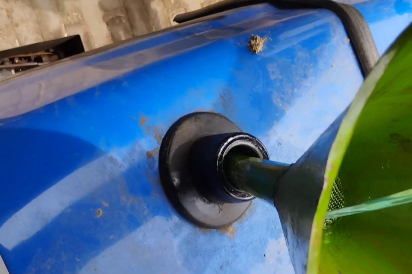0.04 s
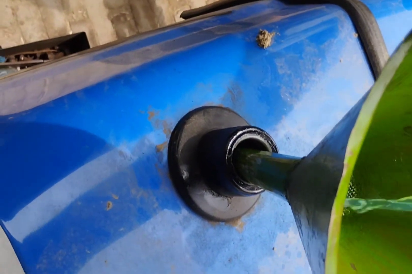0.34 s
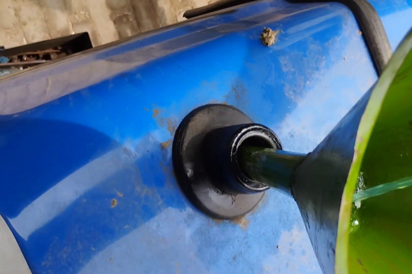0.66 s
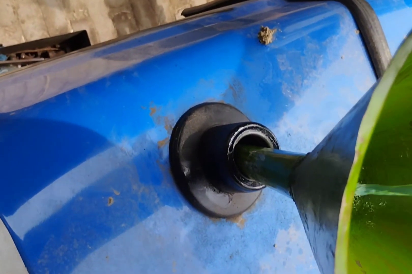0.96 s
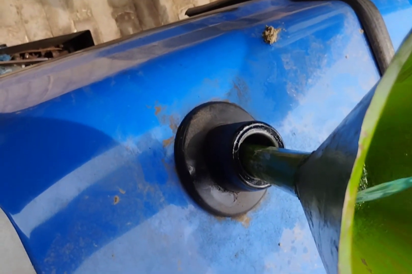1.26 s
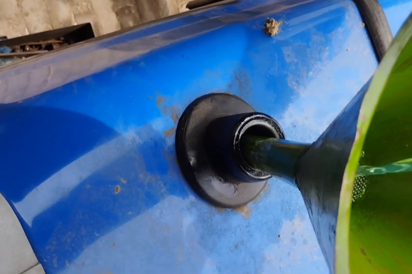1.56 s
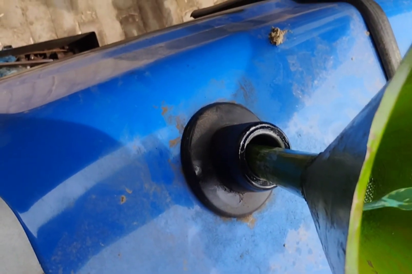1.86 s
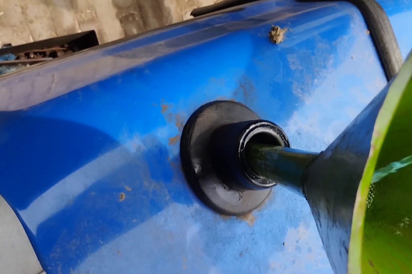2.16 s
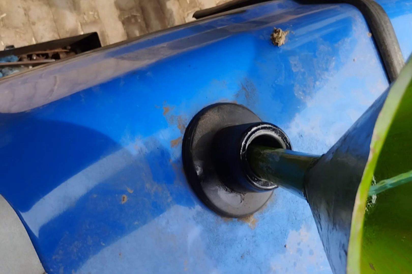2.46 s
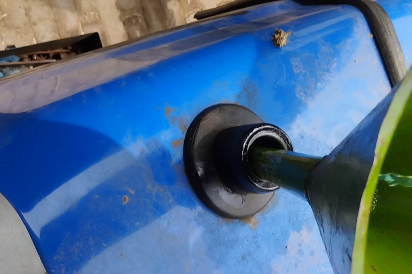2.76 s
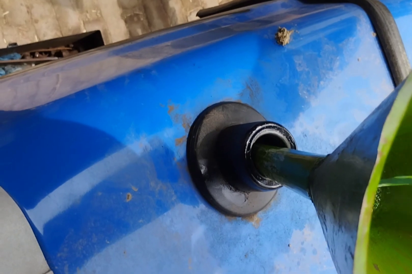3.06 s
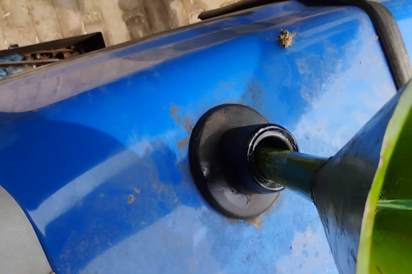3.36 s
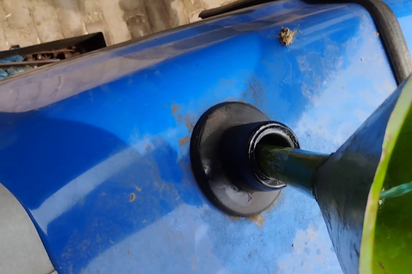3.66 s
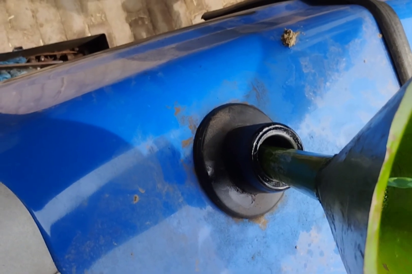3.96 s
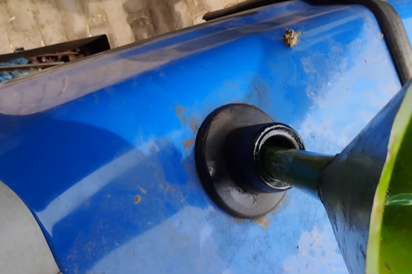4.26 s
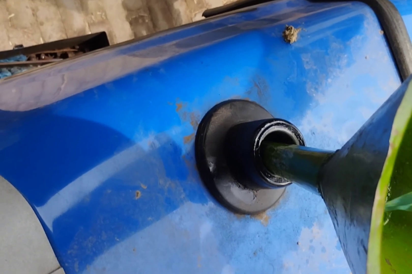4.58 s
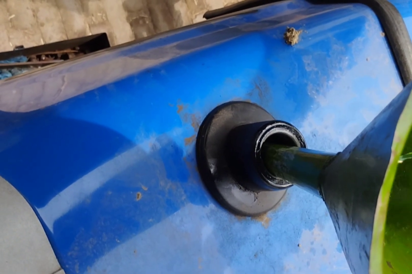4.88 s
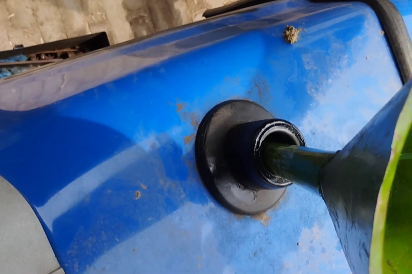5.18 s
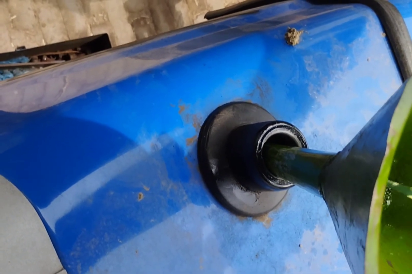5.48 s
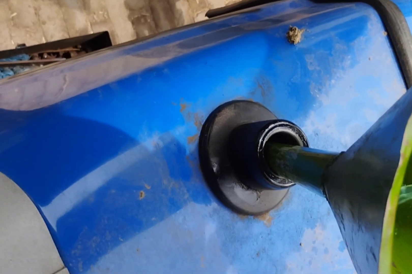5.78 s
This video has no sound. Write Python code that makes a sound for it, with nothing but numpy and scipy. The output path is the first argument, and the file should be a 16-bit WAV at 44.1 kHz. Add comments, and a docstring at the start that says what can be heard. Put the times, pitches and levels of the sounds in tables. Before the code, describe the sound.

Fuel trickles in spurts into a plastic funnel, fizzing on the strainer and gurgling hollowly down the spout, with light wind.

```python
"""Outdoors at a metal tank, the microphone close to a plastic funnel. A thin stream of fuel trickles
onto the strainer in spurts. Spray and bursting froth crackle on the mesh, drops tick and splat on the
funnel wall, and the spout gurgles hollowly, its note sinking at first as the neck clears.
Light wind rumbles on the microphone."""
import sys
import numpy as np
from scipy import signal
from scipy.fft import rfft, irfft, next_fast_len
from scipy.io import wavfile
from scipy.ndimage import map_coordinates

SR = 44100
rng = np.random.default_rng(int(sys.argv[2]) if len(sys.argv) > 2 else 0)


def transcribe(signal):
    """Save signal, clipped to [-1, 1], as a 16-bit WAV file at the path in sys.argv[1]."""
    frames = np.atleast_2d(signal).T
    limited = np.clip(frames, -1, 1)
    pcm = np.round(limited * 32767).astype(np.int16)
    wavfile.write(sys.argv[1], SR, pcm)


N = 257103
TIME = np.arange(N) / SR
EVENT_TIME = TIME[:SR // 10]  # the 0.1 s that one drop or bubble is given
TRICKLE_DB = -57.5  # relative level of the spray between spurts

# Resonances of the plastic funnel. Each row: frequency in Hz, width in Hz, gain in dB.
FUNNEL_MODES = [(658, 100, 5), (800, 60, 3.5), (875, 74, 12), (992, 42, 7.5), (1284, 49, 5),
                (1482, 38, 4.5), (1537, 31, 6.5), (1714, 44, 6), (1822, 69, 6.5), (1916, 56, 0),
                (2125, 30, 4.5), (2633, 180, -2.5), (3076, 186, 5), (3315, 114, 5), (3660, 170, -17),
                (4620, 90, 0.5), (4800, 180, -35)]
# Tone colour of the spray. Each row: frequency in Hz, gain in dB.
SPRAY_COLOUR = [(300, -17), (1500, -19), (4200, -17.5), (5500, -15), (7000, -8.5), (8000, -2), (8900, -2),
                (9900, -5.5), (10700, -3), (12000, -9.5), (13500, -11), (16000, -11.5)]
# Gulps in the spout. Each row: start in seconds, relative levels of plop and slap in dB, pitch in Hz.
SPOUT_GULPS = [(.056, -48, -58, 940), (.076, -46, -57, 846), (.16, -47, -72, 730), (.253, -37.5, -58, 766),
               (.43, -44, -72, 667), (.555, -43.5, -55.5, 850), (.703, -36, -55.5, 446),
               (.8215, -42, -62, 426), (.8365, -56, -53, 503), (1.22, -37, -68, 445),
               (1.819, -46, -58.5, 485), (2.056, -43, -75, 450), (2.215, -43, -76, 427),
               (2.412, -49, -58, 487), (2.61, -41, -58, 500), (2.732, -44, -63, 455),
               (3.254, -40, -57, 475), (3.506, -44, -67, 510), (3.636, -53, -58, 480),
               (3.85, -42, -56, 455), (3.954, -45, -57, 472), (4.066, -47, -61, 460),
               (4.072, -42.5, -68, 660), (4.24, -41.5, -66, 496), (4.366, -38.5, -58, 465),
               (4.561, -45, -55.5, 492), (4.777, -39, -62, 474), (4.996, -44, -78, 530),
               (5.123, -43.5, -68, 450), (5.308, -42.5, -68, 460), (5.425, -45.5, -72, 480),
               (5.543, -47, -53, 480), (5.543, -49, -62.5, 763)]


def spurts():
    """The wavering stream swells and ebbs over a steady trickle: level curves for spray and splatter."""
    # Each row: middle in seconds, relative spray level in dB, length in seconds,
    # relative splatter level in dB.
    landings = [(0.094, -58, 0.08, -63), (0.145, -56, 0.043, -64.5), (0.274, -51.5, 0.033, -62),
                (0.471, -49, 0.059, -66), (0.691, -52, 0.048, -59.5), (0.874, -58, 0.058, -68),
                (0.947, -52, 0.02, -74.5), (1.084, -52, 0.062, -67), (1.298, -50.5, 0.043, -80),
                (1.482, -54.5, 0.059, -64.5), (1.718, -51, 0.1, -77), (1.94, -45, 0.029, -64),
                (2.182, -51.5, 0.04, -67), (2.436, -56, 0.17, -73), (2.71, -51, 0.082, -66.5),
                (2.948, -50.5, 0.048, -63.5), (3.123, -54, 0.031, -64.5), (3.266, -55, 0.074, -67),
                (3.495, -46.5, 0.039, -63.5), (3.683, -49.5, 0.046, -74), (3.941, -48.5, 0.053, -67),
                (4.166, -53, 0.13, -66.5), (4.381, -51, 0.059, -64.5), (4.493, -53.5, 0.04, -64),
                (4.646, -51, 0.038, -67), (4.845, -51.5, 0.17, -65), (5.054, -54, 0.036, -71),
                (5.177, -49, 0.065, -65), (5.33, -51.5, 0.025, -69), (5.44, -48.5, 0.091, -64.5),
                (5.602, -50, 0.018, -66), (5.71, -51, 0.055, -65), (5.783, -53.5, 0.054, -67)]
    middle, spray_db, length, splatter_db = np.transpose(landings)
    bells = .5 ** ((2 * (TIME[:, None] - middle) / length) ** 2)
    def level(db, steady_db):
        return 10 * np.log10(amp(steady_db) ** 2 + bells @ amp(db) ** 2)
    return level(spray_db, TRICKLE_DB), level(splatter_db, steady_db=-92)


def spray(level_db, surge):
    """Froth crackles over the fine hiss of the mesh, which sings more evenly in one narrow band."""
    # Tone colour of the mesh's hiss. Each row: frequency in Hz, gain in dB.
    mesh_colour = [(300, -17.5), (1500, -24.5), (4200, -22.5), (5600, -11.5), (7000, -6.5), (8000, -4.5),
                   (8900, -7), (10700, -6.5), (12000, -7.5), (16000, -12)]
    bubbles = froth(count=3300, pitch_hz=10020, drift=0.13, scatter=0.162, cycles=10, spread_db=4)
    crackle = unit(coloured(bubbles, SPRAY_COLOUR))
    hiss = unit(coloured(impacts(rate=6000, spread_db=3.5) * amp(3.5 * wobble(170)), mesh_colour))
    sing = unit(resonate(impacts(rate=5000, spread_db=6.5), [(9030, 460, 0)]))
    fizz = amp(level_db + 2.7 * surge - 5) * (crackle + hiss)
    return fizz + amp(-60.5 + 0.25 * (level_db - TRICKLE_DB)) * sing


def pops(grit_db=3.5, harden=0.099, shorten=0.03):
    """Clumps of bubbles burst on the mesh: small ones round and pitched, big ones a short, broad snap."""
    # Each row: time in seconds, relative level in dB, pitch in Hz.
    clumps = [(0.0645, -29.5, 9000), (0.079, -27, 7750), (.194, -27, 9900), (.212, -42, 9100),
              (0.257, -35, 9200), (0.2804, -29, 9600), (0.3193, -24.5, 9800), (0.3752, -32, 9200),
              (0.432, -18, 10100), (0.5004, -40, 9400), (0.561, -33.5, 8600), (0.697, -25.5, 9700),
              (0.837, -26, 8900), (0.984, -34, 8800), (1.032, -31, 10600), (1.066, -32, 8600),
              (1.145, -21, 9160), (1.306, -25.5, 9300), (1.492, -25, 7500), (1.825, -24.5, 9200),
              (1.8875, -22.5, 10900), (1.9173, -26, 12000), (1.938, -25.5, 9500), (1.952, -30, 8700),
              (1.998, -26.5, 8900), (2.158, -31, 8050), (2.164, -29, 8700), (2.176, -30, 8140),
              (2.21, -23, 8600), (2.27, -27.5, 9860), (2.449, -29, 9100), (2.4616, -32.5, 8500),
              (2.69, -22.5, 8150), (2.704, -32, 7990), (2.7432, -28, 9100), (2.796, -27, 8750),
              (2.829, -28, 8130), (3.196, -29, 10650), (3.228, -34, 10500), (3.257, -37, 8700),
              (3.302, -31, 9850), (3.3855, -30.5, 10700), (3.434, -26, 9700), (3.535, -24, 9200),
              (3.6, -30, 9800), (3.749, -25, 8800), (3.845, -28.5, 9500), (4.2974, -27.5, 8800),
              (4.3758, -28, 7600), (4.5579, -13, 9100), (4.634, -25, 8700), (4.817, -29, 7600),
              (4.8896, -24, 9600), (5.0566, -26.5, 10000), (5.125, -29.5, 8500), (5.167, -28, 10700),
              (5.5874, -35, 9200), (5.6926, -36, 8200), (5.781, -29.5, 9400)]
    out, t = np.zeros(N), EVENT_TIME
    for s, db, hz in clumps + strays(count=14, level_db=-30, spread_db=2.5, pitch_hz=9470, scatter=0.12):
        length_s = 0.0062 * np.exp(-shorten * (db + 31.5))
        puff = rng.standard_normal(len(t)) * fade_in(0.0014) * np.exp(-(t / length_s) ** 2)
        spit = coloured(puff * amp(grit_db * rng.standard_normal(len(t))), SPRAY_COLOUR)
        ring = unit(resonate(spit, [(hz, 600, 0), (hz * rng.uniform(1.0, 1.3), 700, -4)]))
        snap = amp(harden * (db + 5)) * unit(spit)
        add(out, s - .0006, amp(db - 7) * crest(snap + ring))
    return out


def strays(count, level_db, spread_db, pitch_hz, scatter):
    """Stray pops at random moments. Each row: time in seconds, relative level in dB, pitch in Hz."""
    when, faintness, pitch = rng.random((count, 3)).T
    db = level_db - spread_db * (2 * faintness - 1)
    hz = pitch_hz * np.exp(scatter * (2 * pitch - 1))
    return list(zip(when * TIME[-1], db, hz))


def plinks(cycles=17):
    """A lone bubble pinches off on the mesh with a wet lick and rings, its pitch rising."""
    # Each row: start in seconds, relative level in dB, pitch in Hz.
    lone_bubbles = [(.058, -40.5, 5880), (.2345, -33.5, 9200), (.623, -39, 6660), (.762, -37, 10000),
                    (.823, -34, 9350), (.936, -35, 10000), (.985, -34, 9040), (.991, -33, 8700),
                    (1.071, -31, 8440), (1.1865, -41, 8240), (1.239, -33, 9560), (1.5495, -40, 10900),
                    (1.5565, -37, 9390), (1.6075, -40, 9860), (1.694, -35, 8670), (1.95, -33, 7800),
                    (1.996, -34, 11150), (2.1533, -30.5, 8560), (2.177, -35, 7020), (2.2395, -37, 10200),
                    (2.3455, -38, 10500), (2.4465, -41, 8140), (2.7944, -34, 8320), (2.9335, -36, 7760),
                    (3.256, -36, 6160), (3.3535, -39, 9800), (3.5065, -43, 4380), (3.639, -38, 9150),
                    (3.658, -37, 8650), (3.715, -38, 8700), (3.776, -44, 9900), (3.815, -38, 10300),
                    (3.9245, -41, 8660), (3.962, -35, 9560), (4.1382, -35, 8220), (4.3465, -40, 10160),
                    (4.3755, -33, 7950), (4.6445, -34, 7840), (4.86, -38, 10250), (4.873, -36, 8450),
                    (4.8905, -35, 8330), (4.942, -39, 10000), (4.985, -35, 10300), (5.1515, -41, 7740),
                    (5.1545, -39, 10900), (5.4305, -35, 8700), (5.4465, -35, 12230), (5.4575, -47, 8220),
                    (5.4985, -36, 10300), (5.5935, -39, 7750), (5.6005, -38, 9300), (5.6645, -41.5, 6900),
                    (5.678, -36, 7920), (5.6965, -35, 7270), (5.7805, -38, 9470)]
    out = np.zeros(N)
    for s, db, hz in lone_bubbles:
        ring = rising_tone(hz, rise=7, attack=0.00049) * np.exp(-hz * EVENT_TIME / cycles)
        lick = resonate(burst(t60=0.02, attack=0.0007), [(hz, 1100, 0)])
        add(out, s, amp(db - 5.5) * crest(unit(ring) + amp(-9) * unit(lick)))
    return out


def gurgle(surge, overtone_ratio=2.8, fade_db_per_s=30):
    """Drops ring the spout's air column and stir deep bubbles; an overtone fades as the neck clears."""
    # Fuel falling through the spout. Each row: time in seconds, relative level in dB.
    drain_levels = [(0, -63), (.1, -61), (.22, -64), (.38, -65.5), (.47, -58), (.62, -60.5), (1.15, -58),
                    (1.7, -58), (2.45, -61.5), (2.75, -58), (3.2, -62.5), (4.2, -59), (4.7, -62),
                    (5.4, -58.5), (5.63, -62), (5.8, -57)]
    # The air column's note follows its free length. Each row: time in seconds, pitch in Hz.
    spout_notes = [(0, 880), (.09, 860), (.17, 754), (.3, 727), (.45, 586), (.53, 460), (.7, 446),
                   (1.3, 430), (2.4, 468), (3.5, 476), (5.8, 503)]
    note_hz = curve(spout_notes)
    blows = impacts(rate=700, spread_db=2) * amp(2.1 * surge + 0.48 * wobble(12))
    air = column(blows, note_hz * np.exp(0.022 * wobble(17)), width_hz=80)
    overtone = column(blows, overtone_ratio * note_hz, width_hz=130) * amp(-3 - fade_db_per_s * TIME)
    stirring = impacts(rate=490, spread_db=4.5)
    bubbles = column(stirring, 1.18 * note_hz * np.exp(0.21 * wobble(30)), width_hz=60)
    gain = np.hypot(amp(curve(drain_levels)), churn())
    return gain * (amp(-3.5) * air + overtone + amp(-13) * bubbles)


def column(blows, note_hz, width_hz):
    """Blows ring a hollow resonance whose pitch moves."""
    turn = np.exp(2j * np.pi * np.cumsum(note_hz) / SR)
    decay = np.exp(-np.pi * width_hz / SR)
    ring = (signal.lfilter([1], [1, -decay], blows / turn) * turn).real
    return unit(coloured(ring, [(150, -34.5), (330, -7.5), (430, -0.5), (900, 2),
                                (2500, -18), (8000, -22.5)]))


def churn(settle_s=0.026):
    """Each gulp leaves the fuel in the spout churning: a gain that rises and settles."""
    gain = np.zeros(N)
    for s, db, _, _ in SPOUT_GULPS:
        age = np.maximum(TIME - s, 0) / settle_s
        gain += amp(db - 14) * np.sqrt(age) * np.exp(1 - 2 * age)
    return gain


def gulps(t60=0.041):
    """A slug of fuel slaps into the spout: a hollow, slightly rising plop that also shakes the funnel."""
    out = np.zeros(N)
    for s, db, slap_db, hz in SPOUT_GULPS:
        tone = rising_tone(hz, rise=0.22, attack=0.0042) * amp(-60 * EVENT_TIME / t60)
        hollow = resonate(burst(t60=0.032, attack=0.0044), [(hz * 1.12, 170, 0)])
        plop = crest(unit(tone) + amp(-7) * unit(hollow))
        slap = crest(resonate(burst(t60=0.015, attack=0.001), FUNNEL_MODES))
        add(out, s, amp(db - 5) * plop + amp(slap_db + 11) * slap)
    return out


def ticks(cycles=6.5):
    """A drop knocks the funnel wall and traps a bubble, which rings briefly as its pitch lifts."""
    # Each row: time in seconds, relative level in dB, bubble pitch in Hz.
    wall_drops = [(0.074, -40, 3350), (.254, -41.5, 3200), (.258, -44, 2090), (0.434, -40, 3190),
                  (0.708, -42, 4570), (.947, -45, 3080), (1.052, -45, 3870), (1.095, -41, 3060),
                  (1.176, -48.5, 2960), (1.217, -44, 3230), (1.309, -44, 3060), (1.473, -45, 3790),
                  (1.497, -44, 3700), (1.519, -46, 3850), (2.052, -38.5, 3420), (2.208, -30.5, 3250),
                  (2.37, -45, 3050), (2.459, -38, 3260), (2.869, -41.5, 3130), (2.951, -42, 5270),
                  (3.116, -45.5, 3210), (3.18, -45.5, 3230), (3.504, -36.5, 3260), (3.507, -41, 5980),
                  (3.584, -44, 1760), (3.749, -40, 3070), (3.749, -47, 1750), (3.845, -41.5, 3520),
                  (3.955, -40, 3040), (4.027, -48.5, 3120), (4.088, -45, 3400), (4.199, -44, 3180),
                  (4.632, -43, 3330), (4.708, -39.5, 2247), (5.418, -43, 5060), (5.524, -46.5, 1700)]
    out = np.zeros(N)
    for s, db, hz in wall_drops:
        bubble = rising_tone(hz, rise=3, attack=0.00066) * np.exp(-hz * EVENT_TIME / cycles)
        blow = burst(t60=0.057, attack=0.0028)
        splash = amp(-12.5) * unit(resonate(blow, [(hz, 600, 0)]))
        knock = amp(-12) * unit(resonate(blow, FUNNEL_MODES))
        add(out, s + 0.001327, amp(db - 3.5) * crest(unit(bubble) + splash + knock))
    return out


def splats():
    """A fat drop lands flat on the funnel: a crack, then a short wet smack with a resonant body."""
    # Each row: start in seconds, level in dB, body pitch in Hz, body width in Hz.
    fat_drops = [(.837, -38, 720, 402), (0.838, -28.5, 13500, 6000), (1.2184, -45, 720, 400),
                 (3.254, -42.5, 850, 450), (3.2865, -44, 845, 450), (3.7498, -42, 3100, 1600),
                 (3.95, -42.5, 1410, 700), (4.708, -34.5, 2340, 800)]
    # Tone colour of the smack. Each row: frequency in Hz, gain in dB.
    smack_colour = [(200, -15), (700, -9), (2500, -3.5), (6000, -1), (16000, 2.5)]
    out = np.zeros(N)
    for s, db, hz, width_hz in fat_drops:
        blow = burst(t60=0.005, attack=0.0003) + amp(-5) * burst(t60=0.03, attack=0.002)
        body = unit(resonate(blow, [(hz, width_hz, 0)]))
        smack = unit(coloured(blow, smack_colour))
        add(out, s, amp(db) * crest(smack + amp(3) * body))
    return out


def splatter(level_db, surge):
    """Each spurt folds in a patch of coarser bubbles that are damped within a few cycles."""
    bubbles = froth(count=1500, pitch_hz=5400, drift=.13, scatter=.18, cycles=3.8, spread_db=4, onset=2)
    return amp(level_db + 0.9) * unit(amp(2 * surge) * bubbles)


def patter(spray_db, surge):
    """The broken stream drums on the funnel and folds in larger bubbles, which the oily fuel damps."""
    swell_db = spray_db - TRICKLE_DB
    drumming = impacts(rate=900, spread_db=0.5) * amp(2.93 * surge)
    wall = unit(resonate(drumming, FUNNEL_MODES))
    bubbles = froth(count=700, pitch_hz=2989, drift=0.083, scatter=0.151, cycles=5.4, spread_db=1)
    bubbling = unit(resonate(bubbles, FUNNEL_MODES))
    return amp(-66.5 + 0.36 * swell_db) * (wall + amp(-3) * bubbling)


def froth(count, pitch_hz, drift, scatter, cycles, spread_db, lift=0.0016, onset=4):
    """Tiny bubbles, each a rising tone that swells and dies; those born together are close in pitch."""
    when = rng.integers(N, size=count)
    detune, strength = rng.standard_normal((2, count))
    hz = np.minimum(pitch_hz * np.exp(drift * wobble(55)[when] + scatter * detune), SR / 2.5)
    age = np.arange(SR // 120)  # samples
    turns = hz[:, None] * age / SR
    envelope = np.exp(-turns / cycles) * (1 - np.exp(-turns / onset))
    gain = amp(spread_db * np.minimum(strength, 2.2))[:, None]
    tones = gain * envelope * np.sin(2 * np.pi * turns * (1 + lift * np.sqrt(turns)))
    return unit(np.bincount((when[:, None] + age).ravel(), tones.ravel(), N)[:N])


def cone(x):
    """Sound bounces across the funnel and leaves a brief diffuse tail."""
    # Each row: delay in seconds, gain as a factor.
    echoes = [(.00155, .06), (.00245, .13), (.00287, .08), (.0034, .05)]
    out = filtered(x, lambda f: 1 + sum(gain * np.exp(-2j * np.pi * f * s) for s, gain in echoes))
    step = SR // 10
    for start in range(0, N, step):
        tail = burst(t60=0.06, attack=0.0025)  # drawn afresh every 0.1 s so no fixed pitch rings
        tail /= np.linalg.norm(tail)
        add(out, start / SR, amp(-7) * signal.fftconvolve(x[start:start + step], tail))
    return out


def wind():
    """Light wind on the microphone: a soft, uneven rumble over distant air."""
    # Each row: time in seconds, level in dB.
    wind_levels = [(0, -57.5), (.9, -55), (2.2, -56.5), (4.6, -56.5), (5.8, -55)]
    # Each row: frequency in Hz, gain in dB.
    air_colour = [(10, 4), (22, 6.5), (38, 0), (75, -6), (150, -13.5), (300, -16.5), (1000, -25.5),
                  (3000, -31), (16000, -72.5)]
    gusts = amp(curve(wind_levels) + wobble(3.32))
    return gusts * unit(coloured(rng.standard_normal(N), air_colour))


def rising_tone(hz, rise, attack):
    """A sine that fades in and glides up from hz."""
    return np.sin(2 * np.pi * hz * EVENT_TIME * (1 + rise * EVENT_TIME)) * fade_in(attack)


def burst(t60, attack):
    """A puff of noise that rises fast and dies by 60 dB in t60 seconds."""
    return rng.standard_normal(len(EVENT_TIME)) * amp(-60 * EVENT_TIME / t60) * fade_in(attack)


def fade_in(attack):
    """The onset of one event, with a time constant of attack seconds."""
    return 1 - np.exp(-EVENT_TIME / attack)


def impacts(rate, spread_db):
    """Random little blows of uneven size, rate a second."""
    hit = rng.random(N) < rate / SR
    return hit * rng.choice([-1, 1], N) * amp(spread_db * np.clip(rng.standard_normal(N), -2, 2))


def wobble(rate):
    """A smooth random curve, rate knots a second."""
    return map_coordinates(rng.standard_normal(int(N * rate / SR) + 4), [TIME * rate])


def curve(rows):
    """One value per sample along (seconds, value) points."""
    return np.interp(TIME, *np.transpose(rows))


def filtered(x, response):
    """Filter x by a complex response, given as a function of Hz."""
    n = x.shape[-1]
    padded = 2 * next_fast_len(n // 2 + 2048)
    return irfft(rfft(x, padded) * response(np.fft.rfftfreq(padded, 1 / SR)), padded)[..., :n]


def coloured(x, points):
    """Minimum-phase filter through (Hz, dB) points."""
    def response(f):
        hz, db = np.transpose(points)
        gain = amp(np.interp(np.log(f + 1), np.log(hz), db))
        cepstrum = irfft(np.log(gain))
        half = len(cepstrum) // 2
        return np.exp(rfft(np.r_[cepstrum[0], 2 * cepstrum[1:half]], 2 * half))
    return filtered(x, response)


def resonate(x, modes):
    """Pass x through parallel resonances of (Hz, width in Hz, dB)."""
    return filtered(x, lambda f: sum(amp(db) * 1j * f * width / (hz * hz - f * f + 1j * f * width)
                                     for hz, width, db in modes))


def add(track, s, sound):
    """Mix a sound in at s seconds."""
    start = max(round(s * SR), 0)
    track[start:start + len(sound)] += sound[:N - start]


def amp(db):
    """Decibels to gain."""
    return 10 ** (np.asarray(db) / 20)


def unit(x):
    """Scale to rms 1."""
    return x / np.sqrt(np.mean(x ** 2) + 1e-20)


def crest(x):
    """Scale to peak 1."""
    return x / (np.abs(x).max() + 1e-20)


def scene():
    """The funnel, dead centre: lumps in the stream drive spray, splatter, patter and gurgle together."""
    surge = unit(wobble(35) + 1.17 * wobble(110))
    spray_db, splatter_db = spurts()
    stream = spray(spray_db, surge) + splatter(splatter_db, surge) + patter(spray_db, surge)
    fuel = stream + gurgle(surge) + pops() + plinks() + ticks() + splats() + gulps()
    return np.tile(cone(fuel) + wind(), (2, 1))


def record(dry, top_hz=15950):
    """Near-mono sound, cut off at top_hz, with a faint left-right shimmer in two treble bands."""
    # Each row: frequency in Hz, side level in dB against the middle.
    side_colour = [(3900, -58), (4400, -4), (5600, -10), (7000, -29), (8700, -64.5), (11000, -49.5),
                   (12000, -35), (14000, -8.5), (15700, -11)]
    side = coloured(dry[0] * unit(wobble(250)), side_colour)
    return filtered(dry + np.array([side, -side]), lambda f: f < top_hz)


dry = scene()
out = record(dry)
transcribe(out)
```